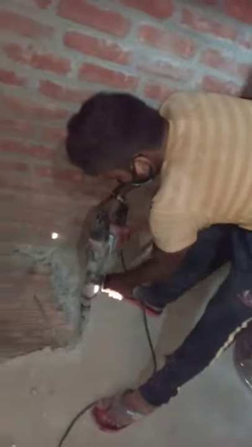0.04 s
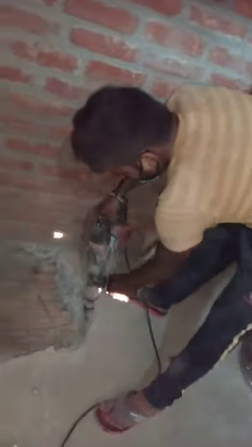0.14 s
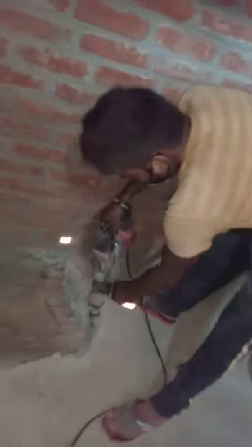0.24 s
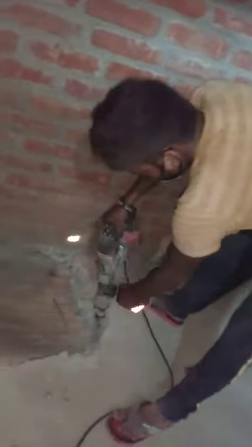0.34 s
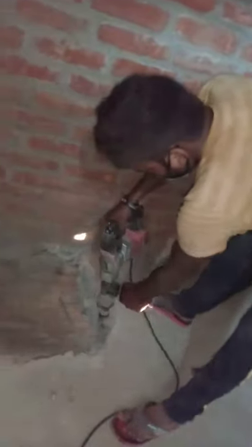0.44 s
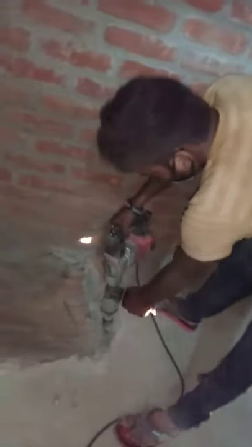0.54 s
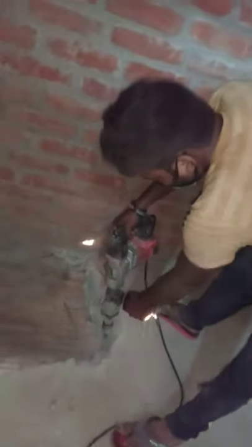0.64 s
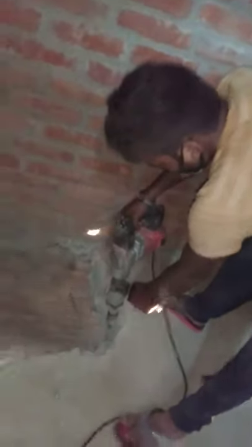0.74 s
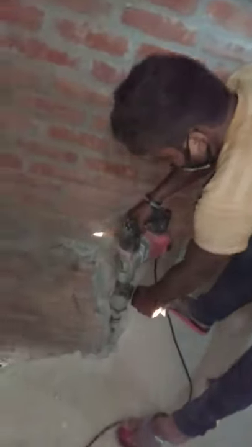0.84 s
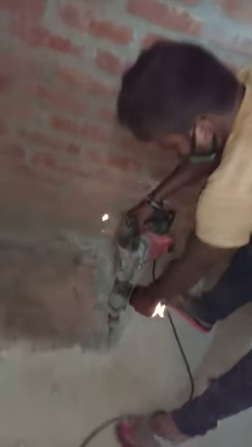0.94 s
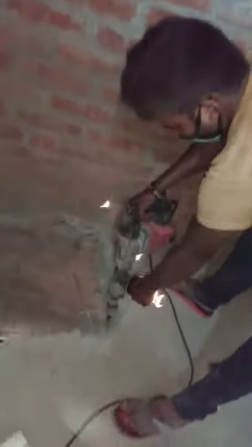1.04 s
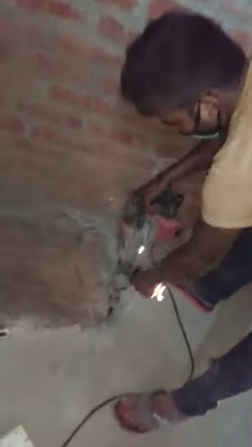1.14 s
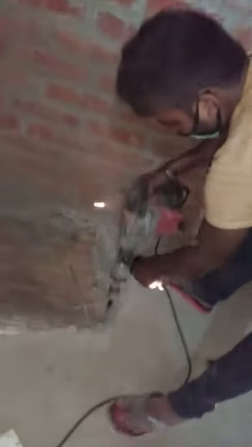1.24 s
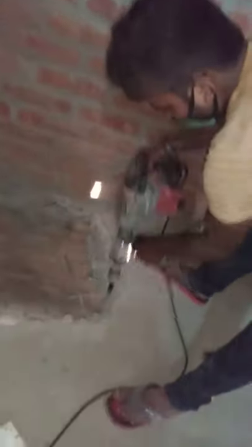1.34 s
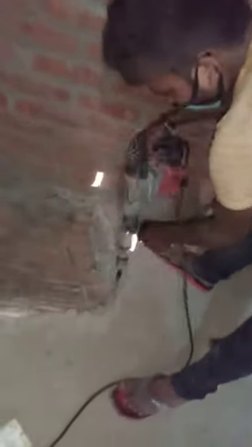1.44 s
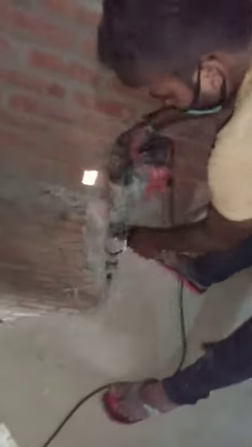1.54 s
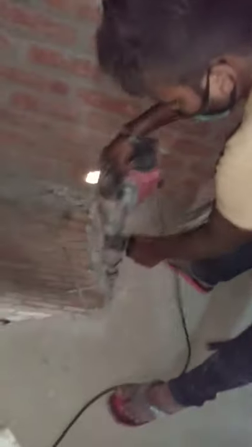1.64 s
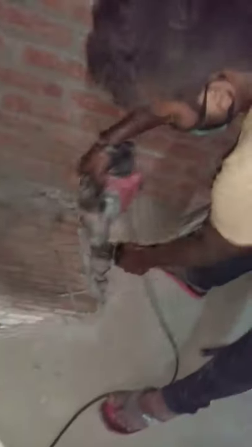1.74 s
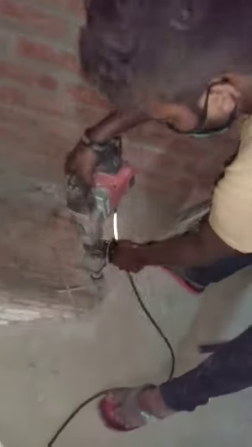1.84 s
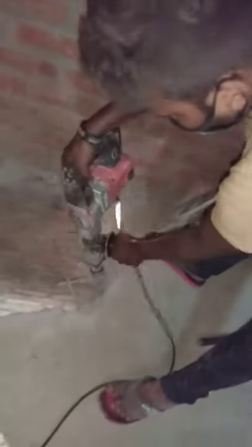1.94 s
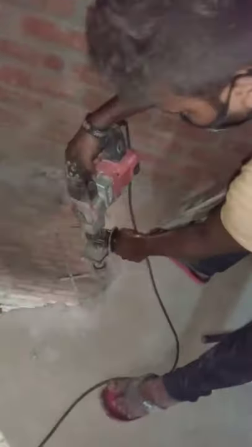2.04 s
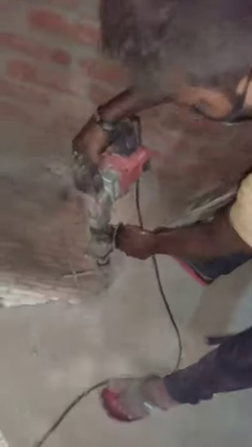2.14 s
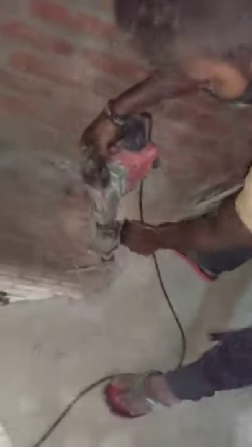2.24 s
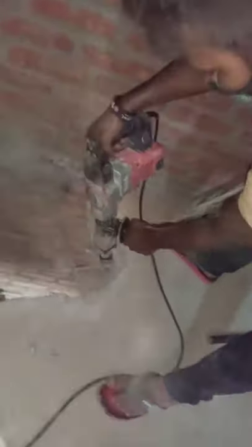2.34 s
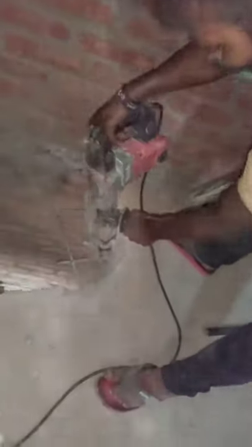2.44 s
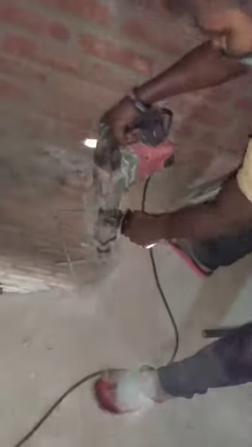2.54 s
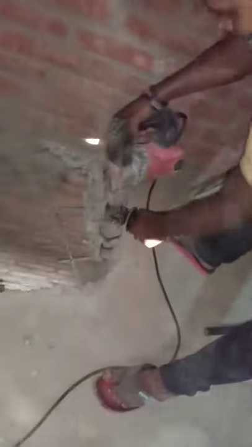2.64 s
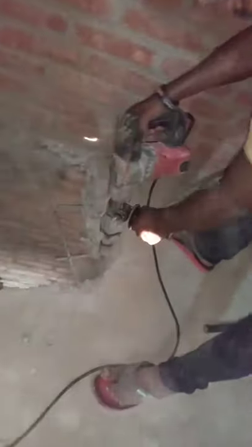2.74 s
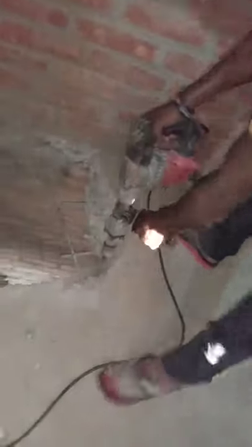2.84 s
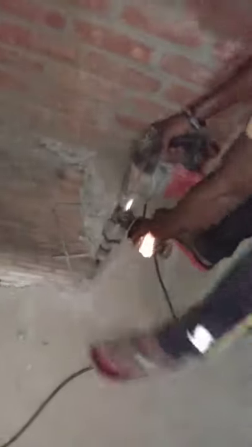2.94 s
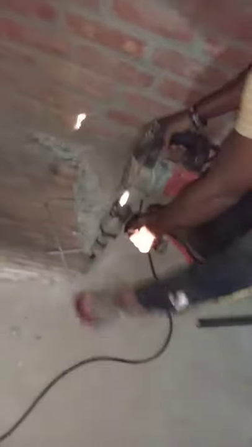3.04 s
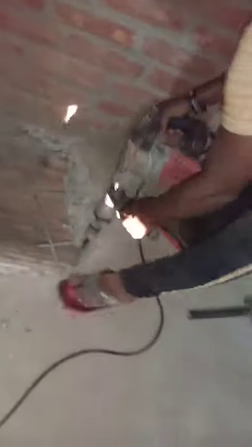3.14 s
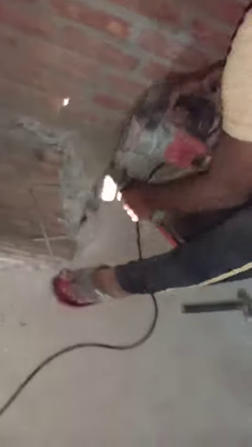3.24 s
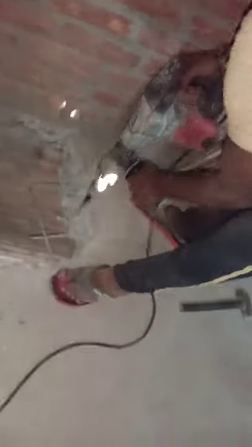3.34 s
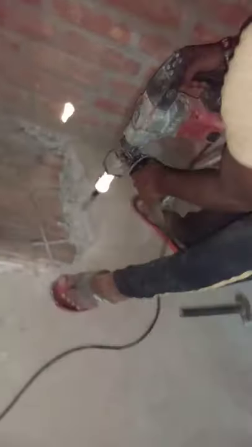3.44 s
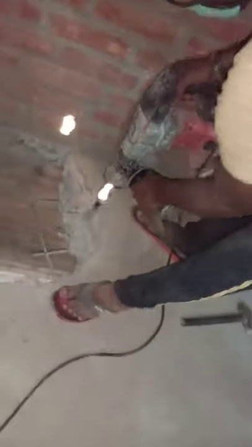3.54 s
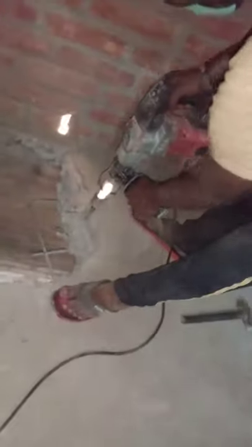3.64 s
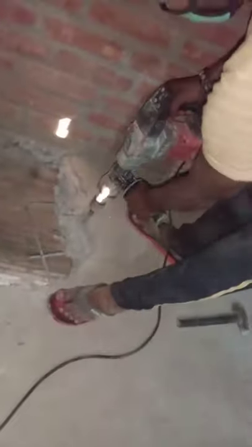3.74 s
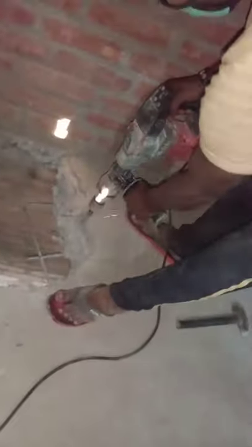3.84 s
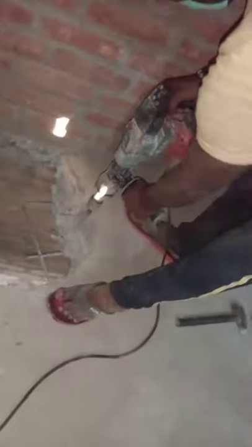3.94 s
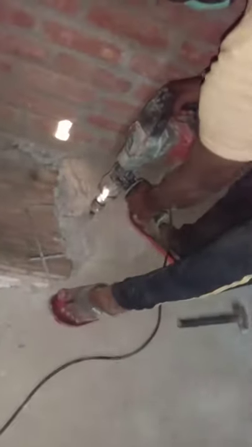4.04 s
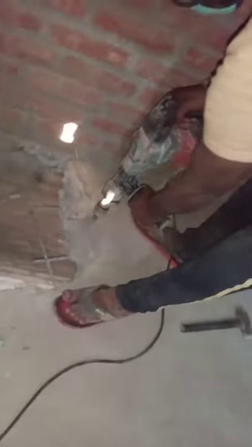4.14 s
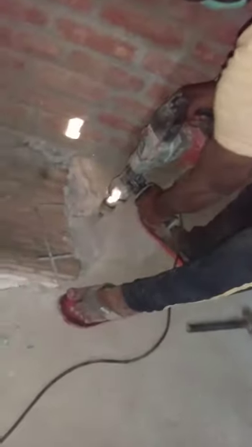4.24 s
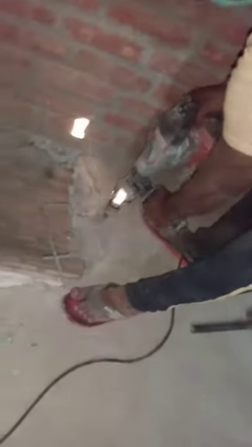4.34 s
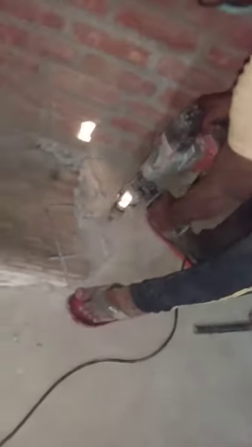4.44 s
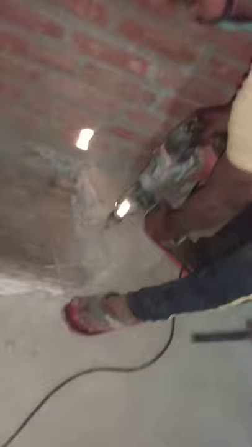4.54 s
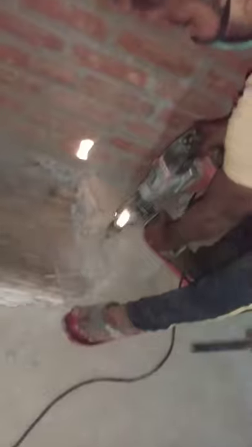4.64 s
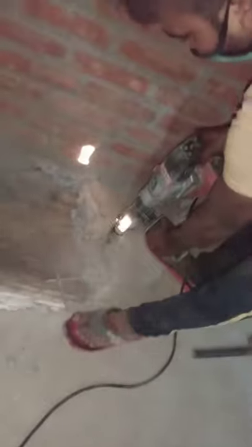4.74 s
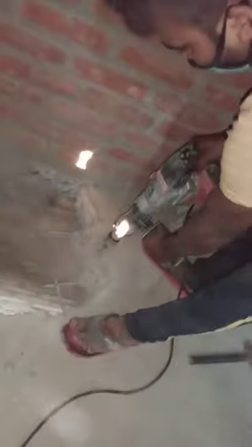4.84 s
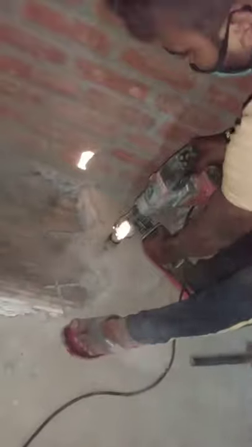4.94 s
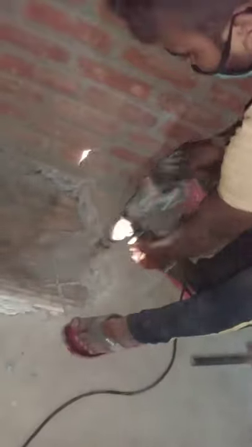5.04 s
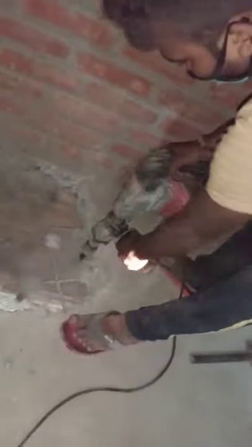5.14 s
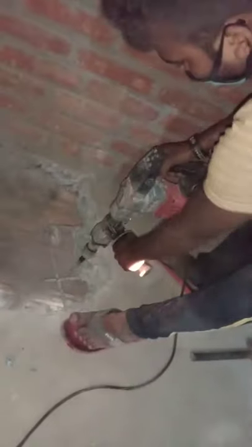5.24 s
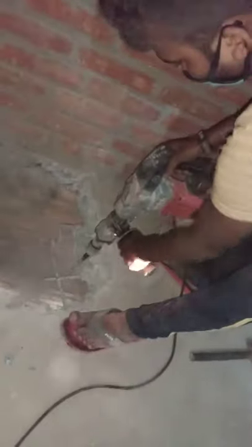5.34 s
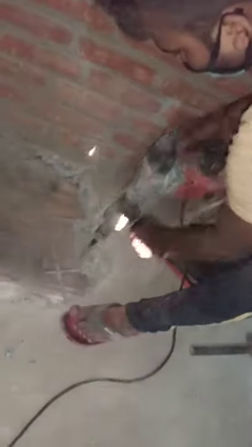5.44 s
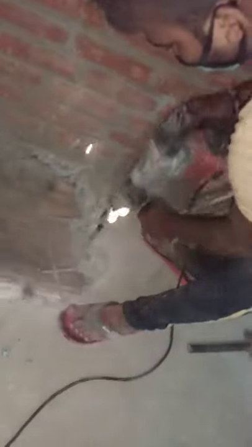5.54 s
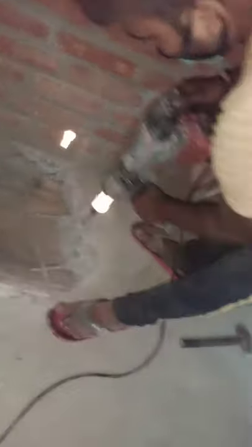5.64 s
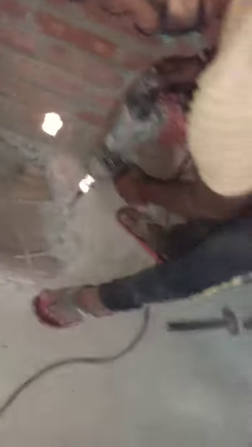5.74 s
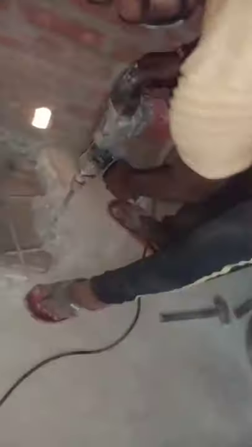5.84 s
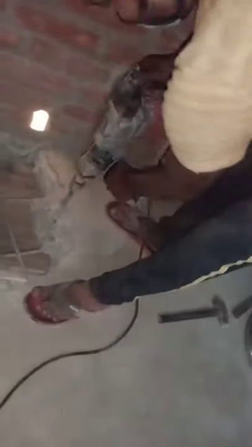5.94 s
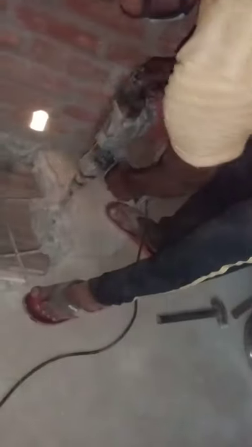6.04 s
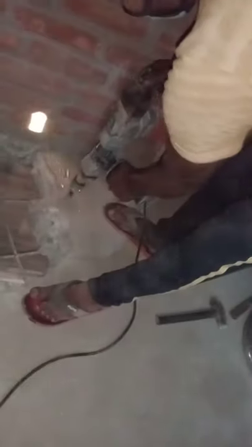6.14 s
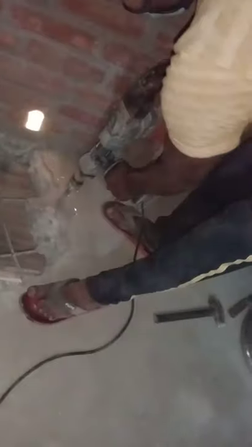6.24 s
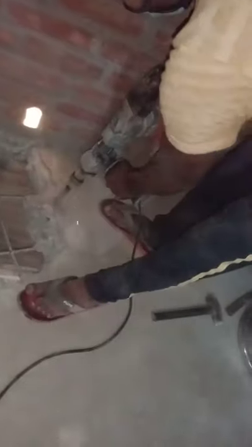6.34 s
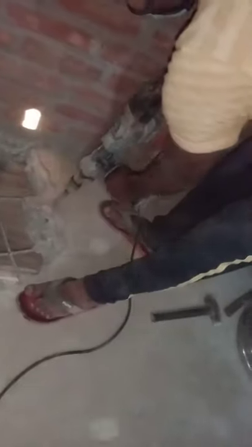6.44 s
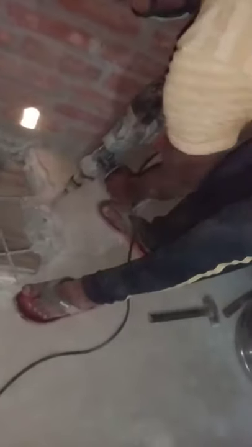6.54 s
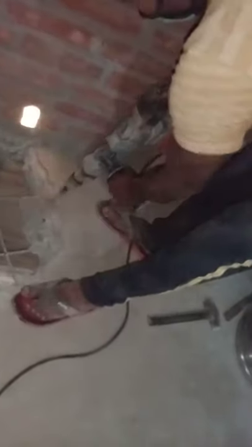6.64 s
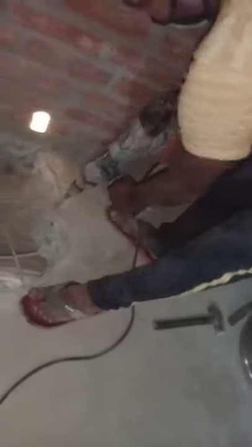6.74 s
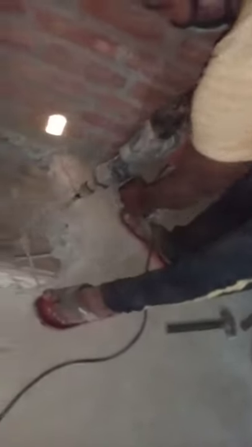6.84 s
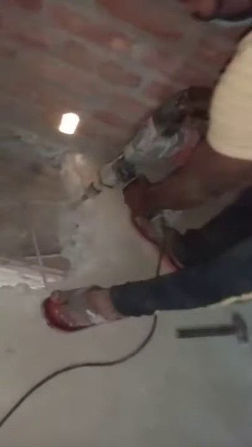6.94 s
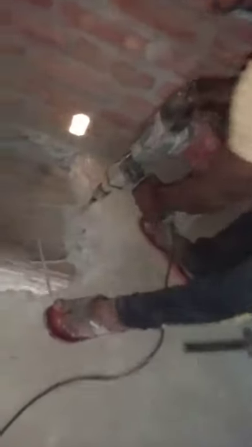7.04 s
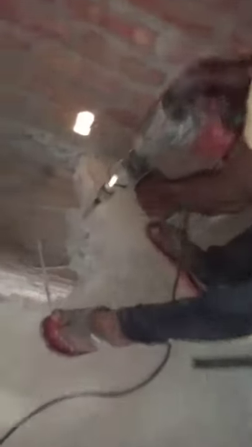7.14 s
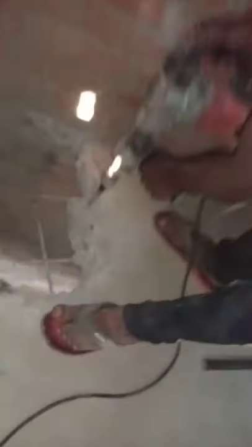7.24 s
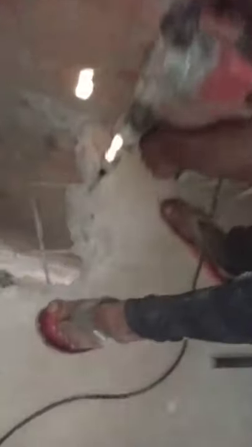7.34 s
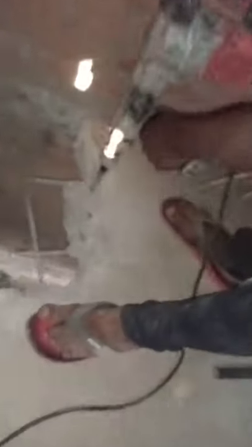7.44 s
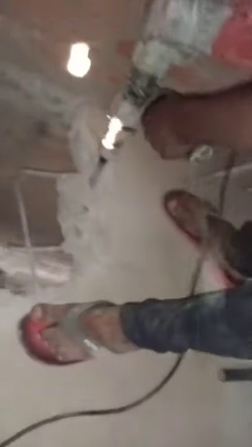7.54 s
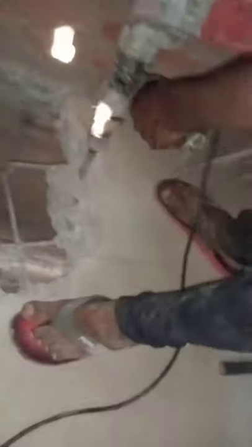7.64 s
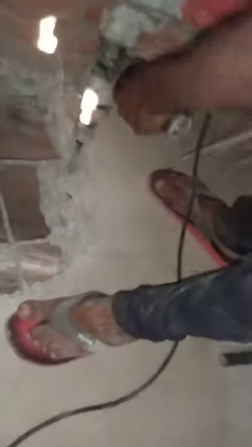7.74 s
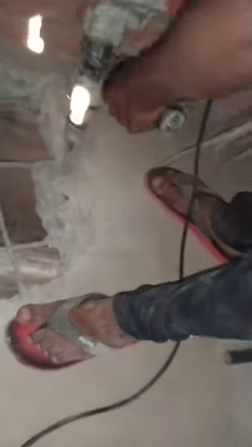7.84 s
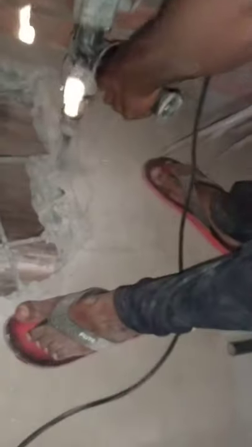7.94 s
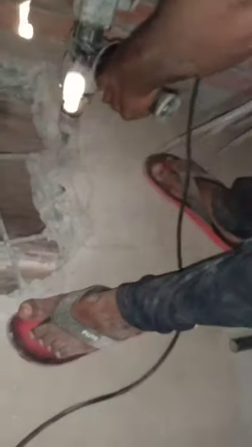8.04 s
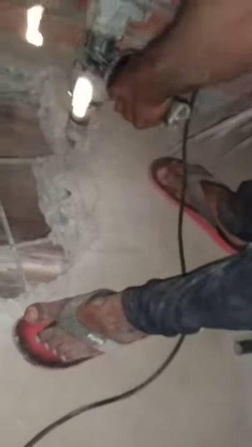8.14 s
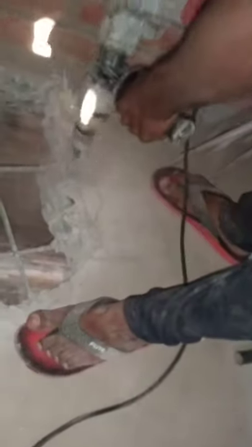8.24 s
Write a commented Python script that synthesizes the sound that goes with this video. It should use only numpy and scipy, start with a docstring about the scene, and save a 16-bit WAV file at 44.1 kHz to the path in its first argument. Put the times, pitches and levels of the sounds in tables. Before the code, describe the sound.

An electric demolition hammer chisels concrete indoors in five harsh rattling bursts, its motor whirring down between them, with brief scrapes and squeals of the tip.

```python
"""Demolition hammer on concrete

An electric hammer chisels concrete at the foot of a brick wall, in five bursts of short pushes.
One crank times the strokes: filtered noise thuds in the masonry and cracks grit, resonators ring the steel.
Clattering gear noise and rotor tones follow the motor as it runs up and coasts down between bursts.
Lone hard blows, narrow-band drones, whines and squeals, and grainy scrapes of the tip join in;
bare walls add a short tail."""
import sys
import numpy as np
from scipy import signal
from scipy.fft import rfft, irfft, next_fast_len
from scipy.io import wavfile
from scipy.ndimage import uniform_filter1d, minimum_filter1d

SR = 44100
rng = np.random.default_rng(int(sys.argv[2]) if len(sys.argv) > 2 else 0)


def to_wav(s):
    """Save 16-bit WAV."""
    ch = np.atleast_2d(s).T  # columns
    pcm = np.round(np.clip(ch, -1, 1) * 32767)  # PCM
    wavfile.write(sys.argv[1], SR, pcm.astype(np.int16))


N = 365148
TIME = np.arange(N) / SR

# relative spectrum of the masonry's thud: pitch_hz [Hz], density_db [dB per Hz]
THUD_SPECTRUM = [(25, -48), (45, -22), (62, -5), (85, -5), (120, 0), (330, 0), (600, -3), (1000, -4.5),
                 (1600, -7.5), (3000, -9.5), (6000, -30.5), (16000, -22.5)]
# relative spectrum of concrete cracking at the tip: pitch_hz [Hz], density_db [dB per Hz]
CRACK_SPECTRUM = [(200, -33), (900, -11), (1800, -4.5), (2800, 0), (3500, -1), (4300, -8.5), (5200, -16),
                  (6800, -10.5), (7900, -2.5), (8700, -5), (9800, -14.5), (11500, -17.5), (15800, -34)]
# the worker leans on the tool: start_s [s], end_s [s], thud_db [dB], crack_db [dB], ring_db [dB against crack]
PUSHES = [(.036, .119, -18.5, -17, -10.5), (.119, .191, -22.5, -25.5, -10), (.191, .297, -18, -19, -14.5),
          (.408, .495, -20.5, -19.5, -14.5), (.539, .645, -19.5, -21.5, -11),
          (.718, .795, -23, -23.5, -13.5), (.88, .915, -22, -19.5, -14), (.975, 1.035, -43, -26.5, -19),
          (1.703, 1.76, -25.5, -22.5, -5.5), (1.812, 1.94, -21, -22.5, -8),
          (1.965, 2.23, -17.5, -18.5, -12.5), (2.23, 2.42, -19.5, -19.5, -19),
          (2.423, 2.602, -21.5, -23, -16), (2.602, 2.76, -22, -23, -12), (2.781, 2.812, -25, -23, -15),
          (2.897, 2.965, -41, -30.5, -8.5), (3.69, 3.876, -20, -22, -6), (3.876, 4.07, -21.5, -23, -12.5),
          (4.144, 4.389, -19.5, -20, -17), (4.389, 4.721, -20, -21, -14), (4.721, 4.98, -21.5, -26.5, -8.5),
          (5.09, 5.14, -38, -26.5, -8.5), (5.885, 6.011, -21, -24.5, -10.5),
          (6.011, 6.215, -18.5, -19.5, -13.5), (6.291, 6.42, -19.5, -21, -12),
          (6.477, 6.555, -22.5, -21.5, -12), (6.603, 6.68, -21, -24.5, -13.5),
          (6.817, 6.885, -19, -24.5, -12), (6.958, 7.02, -25.5, -26.5, -15), (7.715, 7.79, -20, -20, -14),
          (7.821, 7.955, -20.5, -19, -16.5), (7.998, 8.28, -20, -20, -16.5)]


def from_db(db):
    """Decibels to gain."""
    return np.exp(np.asarray(db) * (np.log(10) / 20))


def rms_one(x):
    """Scale to unit rms."""
    return x / np.sqrt(np.mean(x ** 2) + 1e-20)


def curve(rows):
    """A table of (time, value), joined by straight lines."""
    return np.interp(TIME, *np.transpose(rows))


def drift(per_s):
    """Random wander with a spread of one: per_s chance values a second, joined by straight lines."""
    step = TIME * per_s
    return rms_one(np.interp(step, np.arange(4000), rng.standard_normal(4000)))


def colour(x, spectrum):
    """Causal (minimum-phase) filter with the given spectrum and unit power gain."""
    size = 4096
    hz, db = np.transpose(spectrum)
    log_hz = np.log(np.fft.rfftfreq(size, 1 / SR) + 1)
    gain = rms_one(from_db(np.interp(log_hz, np.log(hz), db)))
    # folding the cepstrum onto its causal half gives minimum phase
    cepstrum = irfft(np.log(gain))[:size // 2]
    cepstrum[1:] *= 2
    response = irfft(np.exp(rfft(cepstrum, size)))
    return signal.oaconvolve(x, response)[:N]


def die_away(clicks, t60):
    """Each click starts an exponential decay of its own height, falling 60 dB in t60 seconds."""
    return signal.lfilter([1], [1, -from_db(-60 / (t60 * SR))], clicks + 1e-18)


def grit(spread_db):
    """Noise made of grains of very unequal size."""
    size_db = spread_db * np.clip(rng.standard_normal(N), -3, 3)
    return rms_one(rng.standard_normal(N) * from_db(size_db))


def even(x, window_s):
    """Hold the running rms near one, keeping the single strokes; near-silence is lifted less."""
    power = uniform_filter1d(x ** 2, int(window_s * SR))
    return x / np.sqrt(np.maximum(power, 0) + np.mean(x ** 2) / 20)


def patchy(x, spread_db):
    """Overlapping bands swell and fade by themselves: no two blows break the concrete alike."""
    size, count = next_fast_len(N, real=True), 10
    spectrum, out = rfft(x.astype(np.float32), size), 0
    # each frequency's place among the bands, evenly spaced in log frequency
    log_hz = np.log(np.fft.rfftfreq(size, 1 / SR) + 1)
    place = np.interp(log_hz, np.log([250, 16000]), [0, count - 1])
    for k in range(count):
        share = np.maximum(1 - np.abs(place - k), 0).astype(np.float32)
        band = irfft(spectrum * share, size)[:N]
        out = out + band * from_db(spread_db * drift(110))
    return out


def envelope(start, end, attack_s, release_s, sag_db_per_s):
    """Exponential rise, slowly sagging hold and exponential release."""
    gain = np.zeros(N)
    during = slice(int(max(start, 0) * SR), int((end + 8 * release_s) * SR))
    age = np.maximum(TIME[during] - start, 0)
    after = np.maximum(TIME[during] - end, 0)
    gain[during] = (1 - np.exp(-age / attack_s)) * from_db(-sag_db_per_s * age) * np.exp(-after / release_s)
    return gain


def crank_speed():
    """Strokes per second: the motor runs up while the trigger is held, then coasts against its fan."""
    # the trigger is held: on_s [s], off_s [s], full_speed [strokes per s]
    triggers = [(0, 1.03, 60.3), (1.7, 2.75, 55.8), (3.68, 5.25, 58), (5.85, 6.87, 62), (7.66, 8.28, 65.5)]
    spin_up_s = 0.170   # time constant under power
    coast_s = 1.3   # fan drag halves the speed in this time
    speed = np.full(N, float(triggers[0][2]))
    for on, off, full in triggers:
        driven, coasting = TIME >= on, TIME > off
        shortfall = np.interp(on, TIME, speed) - full
        speed[driven] = full + shortfall * np.exp((on - TIME[driven]) / spin_up_s)
        speed[coasting] = np.interp(off, TIME, speed) / (1 + (TIME[coasting] - off) / coast_s)
    return speed


def strokes(crank, jitter_s, spread_db, lag_turns):
    """Each push catches the striker at once; then it lands once per crank turn, a little unevenly."""
    catch_times = [0] + [row[0] for row in PUSHES] + [TIME[-1]]
    caught = np.interp(catch_times, TIME, crank)
    clicks = np.zeros(N)
    for first, last in zip(caught, caught[1:]):
        turns = np.arange(first, last - .5, 1) + lag_turns
        chance = rng.standard_normal(size=(128, 2))[:len(turns)]
        at = np.interp(turns, crank, TIME) + jitter_s * chance[:, 0]
        clicks[np.clip(at * SR, 0, N - 1).astype(int)] = from_db(spread_db * chance[:, 1])
    return clicks


def pressure():
    """Gains of thud, crack and ring: a light rattle on contact, full blows under each push."""
    # the tip rests on the concrete and rattles lightly: start_s [s], end_s [s]
    contacts = [(0, 0.85), (1.68, 2.28), (3.692, 4.95), (5.865, 7.07), (7.69, 11)]
    rattle_thud_db, rattle_crack_db, rattle_ring_db = -33, -30, -15   # ring is against crack
    attack_s, release_s = 0.0038, .014   # time constants of the bite and of the let-go
    push_sag_db_per_s = 8   # the blows soften as the concrete gives way
    rattles = [(start, end, rattle_thud_db, rattle_crack_db, rattle_ring_db) for start, end in contacts]
    gains = np.zeros((3, N))
    for rows, sag in ((rattles, 0), (PUSHES, push_sag_db_per_s)):
        for start, end, thud_db, crack_db, ring_db in rows:
            shape = envelope(start, end, attack_s, release_s, sag)
            levels = from_db([thud_db, crack_db, crack_db + ring_db])
            gains = np.maximum(gains, np.outer(levels, shape))
    return gains


def chisel(blows, force):
    """The bar's modes: resonators struck with a new strength by every blow."""
    # modes of the steel bar: pitch_hz [Hz], level_db [dB, relative], t60_s [s]
    modes = [(7570, -.5, .04), (7635, 1.5, .05), (7730, 0, .035), (8020, -2, .015), (12130, -1.5, .055),
             (12250, -5, .025), (12568, -.5, .1), (12620, -7, .015)]
    # how strongly the upper modes reach the listener as the tool is turned: time_s [s], level_db [dB]
    upper_ring = [(0, -4.5), (2.4, -2), (4.3, 0.5), (6, 2.5), (8.28, 3.5)]
    upper_above_hz = 10000
    contact, out, upper = die_away(blows, t60=0.11), 0, from_db(curve(upper_ring))
    for hz, level_db, t60 in modes:
        r, w = from_db(-60 / (t60 * SR)), 2 * np.pi * hz / SR   # pole radius and angle
        strike = rms_one(contact * rng.standard_normal(N))
        push = force * strike * np.sqrt(2 * (1 - r * r))   # long and short modes come out equally loud
        gain = from_db(level_db) * (upper if hz > upper_above_hz else 1)
        out = out + gain * signal.lfilter([0, np.sin(w)], [1, -2 * r * np.cos(w), r * r], push)
    return out


def housing(x):
    """The gear housing radiates through a few resonances."""
    # resonances of the housing: pitch_hz [Hz], width_hz [Hz], level_db [dB]
    resonances = [(135, 29, -12), (346, 22, -13), (632, 19, -9), (1817, 110, -2), (2523, 220, -7),
                  (3800, 27, -30)]
    return sum(from_db(db) * signal.lfilter(*signal.iirpeak(hz, hz / width, fs=SR), x)
               for hz, width, db in resonances)


def chiselling(crank):
    """Every blow and its rebound shake the masonry, crush concrete and ring the steel."""
    blows = strokes(crank, jitter_s=.0006, spread_db=2.0, lag_turns=0)
    rebounds = strokes(crank, jitter_s=.002, spread_db=2.0, lag_turns=.3)
    blows = blows + from_db(-2.5) * rebounds
    # a hard snap of steel on stone, then the crumbling
    snap_db = -16
    crumble = die_away(blows, t60=0.083) + from_db(snap_db) * die_away(blows, t60=0.0035)
    thud = colour(die_away(blows, t60=0.06) * patchy(grit(spread_db=6.5), spread_db=1.5), THUD_SPECTRUM)
    crack = colour(crumble * patchy(grit(spread_db=3.5), spread_db=2.5), CRACK_SPECTRUM)
    thud_gain, crack_gain, ring_gain = pressure()
    thud = thud_gain * even(thud, window_s=0.034)
    crack = crack_gain * even(crack, window_s=0.025)
    steel = chisel(blows, ring_gain)
    return thud + crack + steel + from_db(-8) * housing(crack)


def motor(crank, speed):
    """Fan rush and gear noise, a clack of the piston on each turn, and wavering rotor tones."""
    # relative spectrum of the gear noise: pitch_hz [Hz], density_db [dB per Hz]
    gear_spectrum = [(30, -38), (80, -45), (150, -14), (260, -20), (500, -10), (1000, -9.5), (1500, -5),
                     (2100, -7), (2500, -4.5), (3200, -3.5), (3900, -11.5), (4800, -21.5), (8600, -14),
                     (11000, -28), (16000, -30)]
    # gear whine before the housing: multiple [x rotor speed], level_db [dB]
    whine_tones = [(5.75, -54), (7, -43), (8, -41), (9, -39), (11, -34)]
    gear_ratio = 6.2   # rotor turns per stroke
    relative_speed = speed / np.mean(speed)
    turn = np.diff(np.floor(crank), prepend=0) * from_db(1.5 * rng.standard_normal(N))
    clack = rms_one(die_away(turn, t60=0.058) * grit(spread_db=2.0))
    rush = relative_speed ** 0.3 * rng.standard_normal(N)
    rotor = gear_ratio * (crank + 0.0026 * drift(35))
    hum = from_db(-54 + 4 * drift(14)) * relative_speed ** 2 * np.sin(2 * np.pi * rotor)
    # the whine swells whenever one of its tones slides through a housing resonance
    whine = sum(from_db(db + 1.2 * drift(40)) * np.sin(2 * np.pi * k * rotor) for k, db in whine_tones)
    gears = colour(from_db(-35.5) * clack + from_db(-35) * rush, gear_spectrum)
    return gears + hum + housing(whine + from_db(-23.5) * (clack + rush))


def knocks():
    """Lone hard blows: decaying noise bursts, each with its own share of thud and crack."""
    # single hard blows as the tip bites or slips: time_s [s], thud_db [dB], crack_db [dB]
    hard_blows = [(0.058, -11, -14), (.897, -12, -20), (1.015, -38, -40), (1.741, -25, -35),
                  (2.782, -12.5, -13.5), (2.95, -20, -36), (3.693, -25, -14), (5.003, -16, -19.5),
                  (5.023, -18, -17.5), (5.123, -12, -13), (5.156, -19, -18), (5.866, -24, -18.5),
                  (6.709, -21, -17), (6.802, -20, -21), (6.959, -16, -17), (7.048, -21, -19),
                  (7.825, -19, -25), (7.998, -14.5, -20)]
    s, thud_db, crack_db = np.transpose(hard_blows)
    thud, crack = np.zeros((2, N))
    thud[(s * SR).astype(int)] = from_db(thud_db)
    crack[(s * SR).astype(int)] = from_db(crack_db)
    thud = colour(die_away(thud, t60=0.043) * grit(spread_db=4.0), THUD_SPECTRUM)
    crack = colour(die_away(crack, t60=0.058) * grit(spread_db=0.5), CRACK_SPECTRUM)
    return thud + crack


def narrow_bands():
    """Noise feeds one resonance for a moment; it swells and fades."""
    # low drones and gear whine of the motor housing, and squeals and hisses of the rubbing tip:
    # start_s [s], end_s [s], pitch_hz [Hz], width_hz [Hz, approximate], level_db [dB rms at mid-swell]
    band_rows = [(0.614, 1.45, 127.8, 12, -54), (1.205, 1.465, 1733, 100, -31.5),
                 (1.444, 1.577, 3050, 1600, -24), (1.648, 1.731, 2627, 58, -23.5),
                 (5.296, 5.854, 330, 16, -50), (5.327, 5.599, 2530, 1400, -25.5),
                 (5.849, 5.935, 2900, 1550, -16.5), (6.872, 6.96, 2790, 150, -31),
                 (7.341, 7.552, 1760, 49, -47), (7.638, 7.755, 2915, 720, -25)]
    out = np.zeros(N)
    for start, end, hz, width, db in band_rows:
        during = (TIME > start) & (TIME < end)
        # two passes of a wider peak give steeper skirts
        b, a = signal.iirpeak(hz, hz / width / np.sqrt(2), fs=SR)
        noise = rng.standard_normal(2 * SR)
        ringing = signal.lfilter(b, a, signal.lfilter(b, a, noise))
        tone = rms_one(ringing[-during.sum():])
        swell = np.sin(np.pi * (TIME[during] - start) / (end - start))
        out[during] += from_db(db) * swell * tone
    return out


def scraping():
    """The tip skids over loose grit in quick, uneven catches, brightest at the start of a drag."""
    # the tip dragged over the concrete: start_s [s], end_s [s], level_db [dB]
    drag_rows = [(1.35, 1.4, -28), (1.383, 1.6, -25), (1.637, 1.694, -22.5), (3.255, 3.285, -28),
                 (5.34, 5.63, -26), (7.263, 7.295, -29), (7.295, 7.335, -26)]
    # relative spectrum of the scrape: pitch_hz [Hz], density_db [dB per Hz]
    scrape_spectrum = [(300, -23), (1200, -5), (2000, 4), (3200, 3), (4000, 1), (4900, -6.5), (6500, -4.5),
                       (8400, 1), (10500, -10.5), (15800, -33)]
    attack_s, release_s, drag_sag_db_per_s = 0.0067, 0.048, 11
    catches_per_s = 170   # the dragged tip snags on grit, on average
    # fresh grit adds a bright hiss that dulls as the tip wears a track
    fresh_grit_db, fresh_grit_hz, dulling_db_per_s = -5, 9800, 110

    def drags(sag_db_per_s):
        """Gain of all drags, the loudest winning where they overlap."""
        return np.max([from_db(db) * envelope(start, end, attack_s, release_s, sag_db_per_s)
                       for start, end, db in drag_rows], axis=0)

    snag_db = 2.6 * np.clip(rng.standard_normal(N), -2, 2)
    snags = (rng.random(N) < catches_per_s / SR) * from_db(snag_db)
    catches = even(die_away(snags, t60=0.093) * grit(spread_db=2.0), window_s=0.028)
    hiss = signal.sosfilt(signal.butter(2, fresh_grit_hz, "high", fs=SR, output="sos"), catches)
    scrape = drags(drag_sag_db_per_s) * colour(catches, scrape_spectrum)
    return scrape + from_db(fresh_grit_db) * drags(dulling_db_per_s) * hiss


def room(x, t60, wet_db, delay_s):
    """Bare brick walls return a dense, short tail: decaying noise of unit energy, after a delay."""
    t = TIME[:SR // 2]
    tail = rng.standard_normal(len(t)) * from_db(-60 * t / t60) * (t > delay_s)
    echoes = signal.oaconvolve(x, tail / np.sqrt(np.sum(tail ** 2)))[:N]
    return x + from_db(wet_db) * echoes


def scene():
    """The crank drives the blows and the motor noise alike."""
    # how much of the motor reaches the listener: time_s [s], level_db [dB]
    motor_level = [(0, 3), (1.3, 0), (3.3, -.5), (5.6, 1.5), (7.4, -1)]
    speed = crank_speed()
    crank = np.cumsum(speed) / SR   # turns so far
    tool = chiselling(crank) + from_db(curve(motor_level)) * motor(crank, speed)
    tool = tool + knocks() + narrow_bands() + scraping()
    return room(tool, t60=0.25, wet_db=-12, delay_s=0.00496)[None]


def record(dry):
    """A fast limiter holds down the tallest peaks; the deepest bass and the top are cut."""
    ceiling_db, release_db_per_s = -5.5, 400
    bass_cut_hz, top_cut_hz = 38, 15900
    over = np.maximum(20 * np.log10(np.abs(dry[0]) + 1e-9) - ceiling_db, 0)
    # the reduction jumps up with a peak, then falls at the release rate
    held = np.maximum.accumulate(over + release_db_per_s * TIME) - release_db_per_s * TIME
    gain_db = uniform_filter1d(minimum_filter1d(-held, size=45), size=45)   # eased in about 1 ms ahead
    bass_cut = signal.butter(2, bass_cut_hz, "high", fs=SR, output="sos")
    limited = signal.sosfilt(bass_cut, dry * from_db(gain_db))
    return signal.sosfilt(signal.ellip(12, .1, 80, top_cut_hz, fs=SR, output="sos"), limited)


dry = scene()
out = record(dry)
to_wav(out)
```